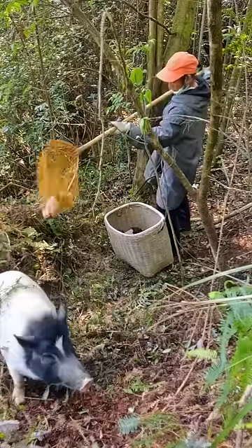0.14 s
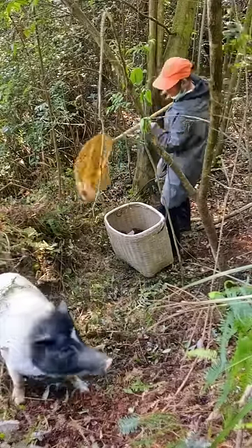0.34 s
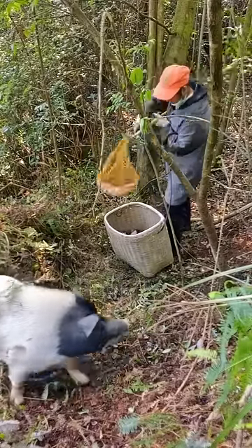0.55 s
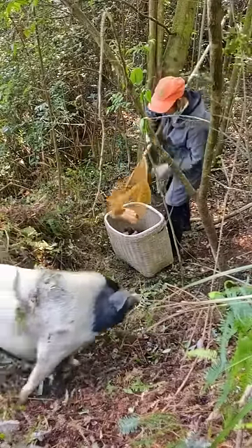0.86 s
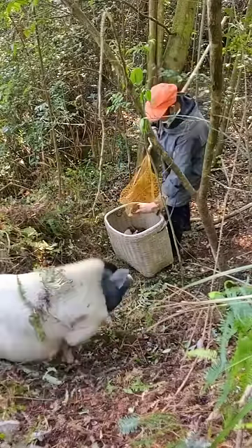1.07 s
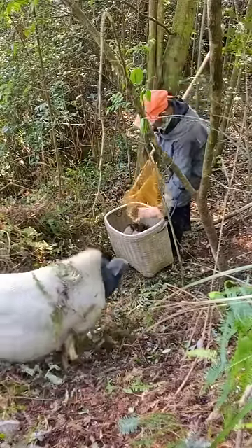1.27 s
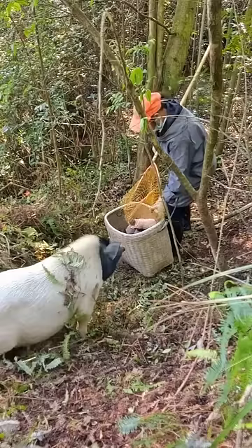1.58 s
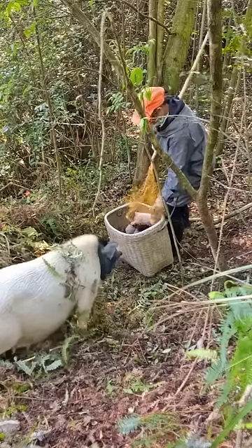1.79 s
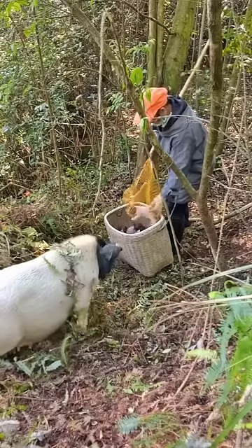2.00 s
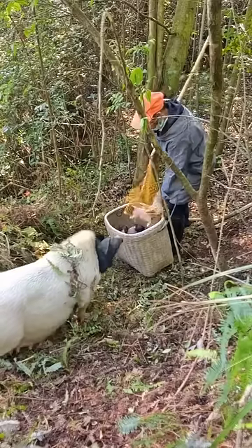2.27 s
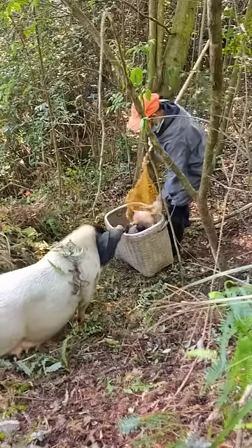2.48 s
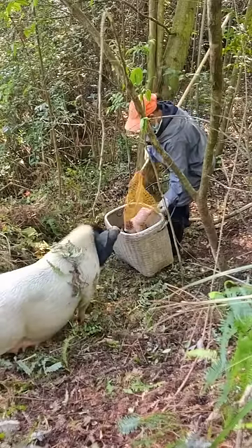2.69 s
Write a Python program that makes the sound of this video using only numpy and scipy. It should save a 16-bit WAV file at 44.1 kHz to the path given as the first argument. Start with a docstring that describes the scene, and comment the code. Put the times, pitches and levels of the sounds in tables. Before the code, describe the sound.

Pig grunting quickly outdoors, deep pulsing grunts with wet snuffles, nasal wheezes and light leaf rustle

```python
"""A sow grunts among dry leaves in a wood, in a rapid run with one short break.
Each grunt is a slow train of throat pulses ringing in her throat and snout.
Between them she snorts, snuffles and wheezes: noise through resonances of the snout and nostrils.
A short higher harmonic cry, probably from a netted piglet, opens the scene.
Leaves rustle and twigs snap as shaped noise, and the wood returns a short scattered echo of the pigs."""
import sys
import numpy as np
from scipy import signal
from scipy.io import wavfile

SR = 44100
rng = np.random.default_rng(int(sys.argv[2]) if len(sys.argv) > 2 else 0)


def generate_wav(sig):
    """Save sig (samples, or channels by samples) to the path in sys.argv[1] as 16-bit PCM at SR."""
    pcm = np.round(np.clip(np.atleast_2d(sig).T, -1, 1) * 32767).astype(np.int16)
    wavfile.write(sys.argv[1], SR, pcm)


N = 125685
T = np.arange(N) / SR


def from_db(db):
    """Logarithmic level: decibels to amplitude gain."""
    return 10 ** (np.asarray(db) / 20)


def rms_one(x):
    """Normalisation: scale to unit power."""
    return x / np.sqrt(np.mean(x ** 2) + 1e-20)


def at_hz(points, hz):
    """Spectral envelope: read a curve on a log-frequency axis."""
    point_hz, values = np.transpose(points)
    return np.interp(np.log(hz), np.log(point_hz), values)


def in_time(rows):
    """Time envelope: read each column of a curve at every sample."""
    seconds, *columns = np.transpose(rows)
    return [np.interp(T, seconds, column) for column in columns]


def arch(u, crest=0.58):
    """Effort envelope: swell from 0 to 1 at the crest and back, as u runs from 0 to 1."""
    return np.sin(np.pi / 2 * np.interp(u, [0, np.clip(crest, .05, .95), 1], [0, 1, 0]))


def drift(rate_hz):
    """Random modulation: low-passed noise with spread 1, made at a fortieth of the sample rate."""
    r = np.exp(-80 * np.pi * rate_hz / SR)
    white = rng.standard_normal(N // 40 + 2002)
    slow = signal.lfilter([1], [1, -2 * r, r * r], white)[2000:]  # skip the filter's start
    return np.interp(np.arange(N) / 40, np.arange(len(slow)), rms_one(slow))


def resonate(x, hz, width):
    """Resonance: a two-pole band-pass applied twice, for steep skirts."""
    r = np.exp(-np.pi * width / SR)
    numerator = [(1 - r * r) / 2, 0, -(1 - r * r) / 2]
    section = numerator + [1, -2 * r * np.cos(2 * np.pi * hz / SR), r * r]
    return signal.sosfilt([section, section], x + 1e-18)


def glide(x, hz, width):
    """Moving resonance: shift the centre to zero, low-pass there, and shift back."""
    turn = np.exp(2j * np.pi * np.cumsum(hz) / SR)
    r = np.exp(-np.pi * width / SR)
    return np.imag(turn * signal.lfilter([1], [1, -2 * r, r * r], x / turn))


def tract(x, rows, scale=1):
    """Formants: parallel resonances, with centres and widths scaled together."""
    return sum(from_db(db) * resonate(x, hz * scale, width * scale) for hz, width, db in rows)


def cut(x, hz, kind):
    """Filtering: second-order high- or low-pass."""
    return signal.sosfilt(signal.butter(2, hz, kind, fs=SR, output="sos"), x + 1e-18)


def add(out, x, start):
    """Superposition: mix x into out at a time."""
    i = max(int(start * SR), 0)
    out[..., i:i + x.shape[-1]] += x[..., :N - i]


def mix(layers, length):
    """Energy balance: sum (sound, dB) layers, each at its level over the length of the call."""
    return sum(from_db(db) * rms_one(x) * np.sqrt(length * SR / len(x)) for x, db in layers)


# Likeness of left and right: hz, correlation
STEREO_LIKENESS = [(200, 0.87), (700, 0.87), (5000, -0.33), (14000, 0.23)]


def banded_noise(colour, patchy_db):
    """Diffuse noise: half-octave stereo bands, each with its own flicker and left-right correlation."""
    out, edges = 0, 30 * 2 ** np.arange(0, 9.6, .5)
    white = rng.standard_normal((2, 2, N))
    for k, (low, high) in enumerate(zip(edges, edges[1:])):
        band = signal.butter(2, [low, high], "band", fs=SR, output="sos")
        mid, side = signal.sosfilt(band, white[k % 2])
        hz = np.sqrt(low * high)
        alike = at_hz(STEREO_LIKENESS, hz)
        stereo = np.sqrt(1 + alike) * mid + np.sqrt(1 - alike) * side * [[1], [-1]]
        out = out + from_db(at_hz(colour, hz) + patchy_db * drift(12.4)) * stereo
    return rms_one(out)


# Cry: time_s, mean_pitch_hz, level_db
CRY_CURVE = [(0, 334.3, -26), (.04, 340.7, -26.5), (.072, 334.5, -33), (.2, 300, -130)]
# Spectral envelope of its harmonics: hz, level_db
CRY_ENVELOPE = [(340, 2.5), (680, 9), (1020, 9.5), (1360, -4), (2750, -20), (4500, -59)]


def cry(jitter, rasp_db):
    """Harmonic series: 14 harmonics of a jittered pitch, with noise pulsing once per period."""
    hz, db = in_time(CRY_CURVE)
    phase = 2 * np.pi * np.cumsum(hz * (1 + jitter * drift(165))) / SR
    harmonics = (from_db(at_hz(CRY_ENVELOPE, k * hz)) * np.cos(k * phase) for k in range(1, 15))
    tone = rms_one(sum(harmonics))
    rasp = rms_one(resonate(rng.standard_normal(N), 2530, 770) * (1 + np.cos(phase)))
    return from_db(db) * (tone + from_db(rasp_db) * rasp)


# Leaf rustle: time_s, level_db
LEAF_LEVEL = [(0, -42), (.45, -53), (.66, -58.5), (.80, -46.5), (1.0, -47.5), (1.3, -39.5), (1.65, -53),
              (2.2, -54.5), (2.85, -61)]
# Spectrum of leaves and twigs: hz, level_db
LEAF_SPECTRUM = [(200, -15.5), (3000, 2), (10000, -2), (14000, -2.5)]
# Twig snaps: start_s, level_db
TWIG_SNAPS = [(.482, -41), (.901, -38), (1.039, -41), (2.104, -52)]
# The net brushing through the undergrowth: start_s, length_s, level_db
NET_SWISH = (-0.12, 0.41, -38.5)
# Spectrum of the swish: hz, level_db
SWISH_SPECTRUM = [(500, -24), (2500, -2), (5500, 1.5), (15000, -12.5)]
LEAF_GRAINS_PER_S, LEAF_GRAIN_SHARE = 790, 0.3
SNAP_S = 0.011  # decay time of a twig


def undergrowth(grain_db, grain_s):
    """Granular friction: random decaying grains and snaps modulate leaf noise; the net swishes."""
    strengths = from_db(grain_db * np.minimum(rng.exponential(1, N), 5))
    grains = (rng.random(N) < LEAF_GRAINS_PER_S / SR) * strengths
    grains = rms_one(signal.lfilter([1], [1, -np.exp(-1 / (grain_s * SR))], grains))
    texture = rms_one(1 - LEAF_GRAIN_SHARE + LEAF_GRAIN_SHARE * grains)
    level = from_db(in_time(LEAF_LEVEL)[0]) * texture
    for start, db in TWIG_SNAPS:
        level = level + from_db(db) * (T >= start) * np.exp(-np.abs(T - start) / SNAP_S)
    start, length, db = NET_SWISH
    swish = from_db(db) * arch((T - start) / length) * banded_noise(SWISH_SPECTRUM, patchy_db=6.0)
    return level * banded_noise(LEAF_SPECTRUM, patchy_db=4.5) + swish


# Spectrum of the still wood: hz, level_db
FLOOR_SPECTRUM = [(130, -25), (270, -0.5), (2400, -9.5), (8000, -40)]


def still_wood():
    """Ambient noise: a faint, patchy, mostly low background."""
    return from_db(-56.5) * banded_noise(FLOOR_SPECTRUM, patchy_db=10.0)


WOOD_T60_S = 0.32
WOOD_TREBLE_DB, WOOD_BASS_DB, WOOD_EDGE_HZ = -0.5, -15.5, 1970


def wood(x, early_s, early_db):
    """Scattering: ground and trunks return the sound, the treble most, differently to each side."""
    t = T[:SR // 2]
    decay = from_db(-60 * t / WOOD_T60_S) + from_db(early_db) * np.exp(-t / early_s)
    tail = rng.standard_normal((2, len(t))) * decay * (t > .001)
    tail /= np.sqrt(np.sum(tail ** 2, axis=1, keepdims=True))
    treble = from_db(WOOD_TREBLE_DB) * cut(x, WOOD_EDGE_HZ, "high")
    sent = treble + from_db(WOOD_BASS_DB) * cut(x, 282, "high")
    return signal.fftconvolve(sent[None], tail, axes=1)[:, :N]


# Nasal wheezes: start_s, length_s, level_db, pitch_hz
NASAL_WHEEZES = [(0.059, 0.2, -39.5, 2155), (1.166, 0.16, -38, 2295), (1.496, 0.09, -33.5, 2427),
                 (1.748, 0.091, -35.5, 2280), (2.05, .11, -41.5, 1070)]
# Resonances of the nostrils: multiple_of_pitch, width_as_share_of_pitch, level_db
NOSTRIL_RESONANCES = [(0.884, 0.05, 18), (1.029, 0.19, 14), (1.24, 0.091, 9.5), (2.2, 1, -5)]
FLUTTER_HZ = 120.2


def wheezes(flutter_db):
    """Turbulence: air hisses through narrowed nostrils, which flutter as it passes."""
    flutter = np.sin(2 * np.pi * FLUTTER_HZ * T + drift(15))
    air = rng.standard_normal(N) * from_db(flutter_db * flutter)
    out = np.zeros(N)
    for start, length, db, hz in NASAL_WHEEZES:
        hiss = rms_one(tract(air, NOSTRIL_RESONANCES, hz))
        out += from_db(db) * arch((T - start) / length) * hiss
    return out


# Snuffling air: time_s, level_db
SNUFFLE_LEVEL = [(.46, -62.5), (.56, -39.5), (.88, -40), (1.10, -75), (1.28, -37.5), (2.12, -37.5),
                 (2.265, -39.5), (2.285, -32), (2.33, -32.5), (2.37, -54.5), (2.522, -48), (2.536, -35),
                 (2.74, -39.5), (2.81, -52.5)]
# Resonances of the snuffling snout: hz, width_hz (of one pass), level_db
SNUFFLE_RESONANCES = [(270, 76, 11.5), (587, 166, 5), (746, 68.5, 10.5), (1078, 170, -3),
                      (2380, 400, -19.5)]
# Low rumble: time_s, level_db
RUMBLE_LEVEL = [(.47, -72.5), (.52, -36), (.96, -34.5), (1.04, -55), (1.3, -57), (1.42, -32.5),
                (2.48, -38.5), (2.55, -51), (2.74, -29.5), (2.8, -49.5)]
# Spectrum of the rumble: hz, level_db
RUMBLE_SPECTRUM = [(25, -40), (62, 7), (250, 0), (450, -55)]


def snuffle(flutter_db):
    """Modulated turbulence: fluttering air excites the snout, with a low rumble under it."""
    fluttering = rng.standard_normal(N) * from_db(flutter_db * drift(50))
    air = rms_one(tract(fluttering, SNUFFLE_RESONANCES))
    rumble = banded_noise(RUMBLE_SPECTRUM, patchy_db=1.5)[0]
    return air * from_db(in_time(SNUFFLE_LEVEL)[0]) + rumble * from_db(in_time(RUMBLE_LEVEL)[0])


JITTER_S, SHIMMER_DB = .0005, 1.4  # spread of pulse times and strengths
LEAD_S = 0.0011  # effort begins before the first pulse


def pulses(rate):
    """Jitter and shimmer: uneven times and strengths of a pulse train, and its regular beat."""
    beat = np.arange(16) / rate
    times = np.abs(beat + JITTER_S * rng.standard_normal(len(beat)))
    strengths = from_db(SHIMMER_DB * rng.standard_normal(len(beat)))
    return times, strengths, beat + LEAD_S


PUFF_S = 0.007  # decay time


def drive(times, strengths, size, rough):
    """Source excitation: each pulse is a click and a dying puff of air; rough weighs the puffs."""
    clicks = np.zeros(size)
    clicks[np.clip(times * SR, 0, size - 1).astype(int)] = strengths
    puffs = signal.lfilter([1], [1, -np.exp(-1 / (PUFF_S * SR))], clicks) * rng.standard_normal(size)
    return rms_one(clicks) + rough * rms_one(puffs)


# Grunts: start_s, length_s, pulses_per_s, crest_as_share_of_length, throat_hz, throat_rise_as_share,
# throat_db, snout_hz, snout_db, mouth_hz, mouth_db, palate_db, rasp_db
# (open-mouth frequencies; levels before the nasal notch)
GRUNT_CALLS = [ (0.4962, 0.1, 64, 0.36, 300, -0.064, -17.5, 740, -34, 1044, -33.5, -35.5, -49),
               (1.055, 0.03, 77, 0.67, 269, 0.0072, -31, 594, -53.5, 1010, -76, -83, -82),
               (1.296, 0.1, 66, 0.4, 289.5, -0.11, -24.5, 753, -34.5, 1065, -42.5, -54, -48),
               (1.4382, 0.09, 93, 0.45, 322, -0.05, -24, 726, -25.5, 1054, -36.5, -43, -46.5),
               (1.673, 0.16, 60, 0.6, 272.4, 0.014, -26, 691, -28.5, 1049, -34, -38.5, -43),
               (1.9626, 0.108, 62, 0.33, 269, -0.047, -25, 711, -32.5, 1035, -36.5, -50, -51),
               (2.396, 0.088, 62, 0.44, 270, 0.18, -24.5, 740, -25, 1162, -42.5, -47, -50),
               (2.643, 0.1, 59, 0.14, 269, 0.13, -27, 703, -25.5, 1246, -50, -40, -47)]
# Rasp resonances: multiple_of_rasp_pitch, width_as_share_of_that_pitch, level_db
RASP_RESONANCES = [(1.001, 0.092, 19.5), (1.331, 0.24, 7), (2.018, 0.18, 11), (2.6, 0.74, -2)]
THROAT_WIDTH_HZ, SNOUT_WIDTH_HZ, MOUTH_WIDTH_HZ = 74, 60, 68
CHEST_HZ, CHEST_WIDTH_HZ, CHEST_DB = 58.6, 26, -25  # level relative to the throat
NECK_HZ, NECK_WIDTH_HZ, NECK_DB = 215, 143, -8  # dull thud of each pulse, relative to the throat
PALATE_HZ, RASP_HZ = 1304, 1760
NOSE_NOTCH_HZ, NOSE_NOTCH_Q = 424, 5.3  # the nasal passage swallows this band
OPENING_SHARE, OPENING_S = 0.26, 0.016  # the resonances start low and rise as the mouth opens


def grunts():
    """Source and filter: even throat pulses drive resonances; the higher ones swell to the crest."""
    out, size = np.zeros(N), SR // 3
    opening = 1 - OPENING_SHARE * np.exp(-T[:size] / OPENING_S)
    for (start, length, rate, crest, throat_hz, rise, throat_db, snout_hz, snout_db,
         mouth_hz, mouth_db, palate_db, rasp_db) in GRUNT_CALLS:
        times, shimmer, beat = pulses(rate)
        effort = arch(beat / length, crest)
        low = drive(times, shimmer * effort ** 0.59, size, rough=0.24)
        middle = drive(times, shimmer * effort ** 1.18, size, rough=0.69)
        high = drive(times, shimmer * effort ** 2.03, size, rough=1.0)
        breath = drive(times, shimmer * effort ** 2, size, rough=2.3)
        bend = 1 + rise * (np.minimum(T[:size] / length, 1) - .5)
        layers = [
            (glide(low, throat_hz * opening * bend, THROAT_WIDTH_HZ), throat_db),
            (glide(low, NECK_HZ * opening, NECK_WIDTH_HZ), throat_db + NECK_DB),
            (resonate(low, CHEST_HZ, CHEST_WIDTH_HZ), throat_db + CHEST_DB),
            (glide(middle, snout_hz * opening, SNOUT_WIDTH_HZ), snout_db),
            (glide(high, mouth_hz * opening, MOUTH_WIDTH_HZ), mouth_db),
            (glide(high, PALATE_HZ * opening, MOUTH_WIDTH_HZ), palate_db),
            (tract(breath, RASP_RESONANCES, RASP_HZ), rasp_db)]
        add(out, mix(layers, length), start)
    return signal.lfilter(*signal.iirnotch(NOSE_NOTCH_HZ, NOSE_NOTCH_Q, fs=SR), out)


# Wet crackles: start_s, level_db, pitch_hz
WET_CRACKLES = [(0.533, -26.5, 1266), (2.015, -29, 1910), (2.177, -35.5, 1500), (2.431, -31, 1653),
                (2.662, -36.5, 1650)]
CRACKLE_S = 0.0027  # decay time


def crackles():
    """Impulsive noise: saliva bursts as a quickly dying spray through the rasp resonances."""
    out, t = np.zeros(N), T[:SR // 20]
    for start, db, hz in WET_CRACKLES:
        spray = rng.standard_normal(len(t)) * np.exp(-t / CRACKLE_S)
        add(out, mix([(tract(spray, RASP_RESONANCES, hz), db)], CRACKLE_S), start)
    return out


# Snorts: start_s, length_s, flaps_per_s, snout_crest_as_share_of_length,
# thump_crest_as_share_of_length, snout_hz, snout_db, thump_db, air_hz, air_db
SNORT_CALLS = [ (0.9, 0.062, 60.56, 0.27, 0.44, 813, -53, -32.5, 2270, -47.5),
               (1.607, 0.03, 71.03, 1, 1, 730, -24, -26.5, 2170, -41),
               (1.875, 0.085, 59.57, 0.15, 0.59, 747, -26.5, -31, 2310, -43.5),
               (2.139, 0.091, 55.6, 0.24, 0.36, 717.5, -24.5, -31, 1480, -46)]
SNORT_WIDTH_HZ, THUMP_HZ, AIR_WIDTH_HZ = 74, 265, 990  # THUMP_HZ is the upper edge of the thump


def snorts():
    """Flow interruption: soft-palate flaps ring the snout, thump the chest and rasp the air."""
    out, size = np.zeros(N), SR // 3
    for (start, length, rate, snout_crest, thump_crest, snout_hz, snout_db,
         thump_db, air_hz, air_db) in SNORT_CALLS:
        times, shimmer, beat = pulses(rate)
        push = shimmer * arch(beat / length, thump_crest) ** 2
        snout = drive(times, shimmer * arch(beat / length, snout_crest), size, rough=0.71)
        thump = drive(times, push, size, rough=0.57)
        air = drive(times, np.sqrt(push), size, rough=13)
        layers = [
            (resonate(snout, snout_hz, SNORT_WIDTH_HZ), snout_db),
            (resonate(thump, CHEST_HZ, CHEST_WIDTH_HZ), thump_db),
            (cut(cut(-thump, THUMP_HZ, "low"), CHEST_HZ, "high"), thump_db),
            (resonate(air, air_hz, AIR_WIDTH_HZ), air_db)]
        add(out, mix(layers, length), start)
    return out


# Smacks of the tongue: start_s, peak_level_db
TONGUE_SMACKS = [(2.341, -18.5), (2.594, -22.5)]
# Resonances of the smacking mouth: hz, width_hz (of one pass), level_db
SMACK_RESONANCES = [(300, 64, -4), (716, 257, 11)]


def smacks():
    """Impulse response: single wet clicks ring the mouth."""
    out = np.zeros(N)
    ring = tract(signal.unit_impulse(SR // 10), SMACK_RESONANCES)
    for start, db in TONGUE_SMACKS:
        add(out, from_db(db) * ring / np.abs(ring).max(), start)
    return out


def scene():
    """Superposition: the pigs and their echo, the undergrowth and the still wood."""
    breath = wheezes(flutter_db=5.5) + snuffle(flutter_db=3.5)
    sow = breath + grunts() + crackles() + snorts() + smacks()
    pigs = sow + cry(jitter=0.033, rasp_db=-11)
    echo = wood(pigs, early_s=0.0088, early_db=10.5)
    return pigs + echo + undergrowth(grain_db=0.5, grain_s=0.0026) + still_wood()


def record(dry):
    """Band limiting: a steep elliptic low-pass at 15500 Hz removes the top."""
    return signal.sosfilt(signal.ellip(10, .1, 80, 15500, fs=SR, output="sos"), dry)


dry = scene()
out = record(dry)
generate_wav(out)
```